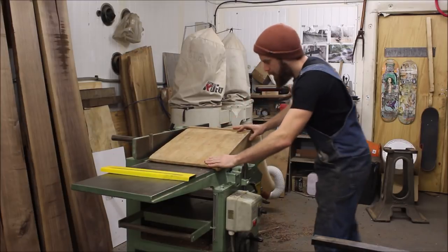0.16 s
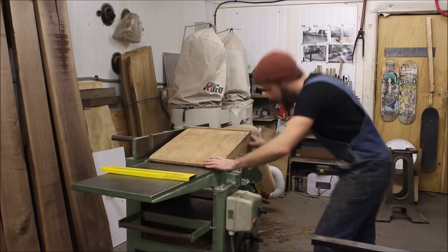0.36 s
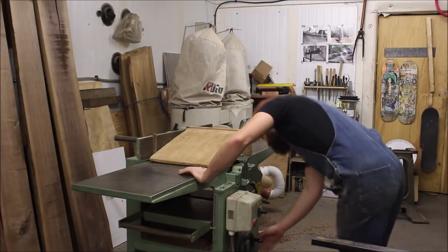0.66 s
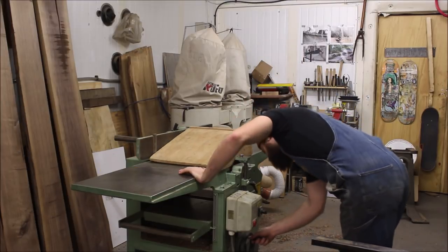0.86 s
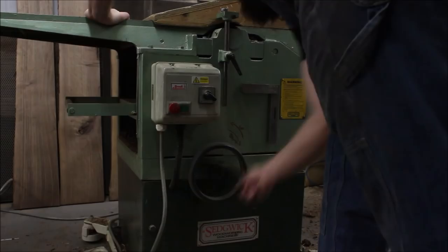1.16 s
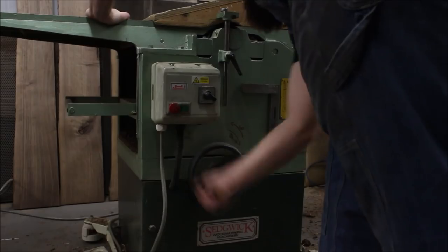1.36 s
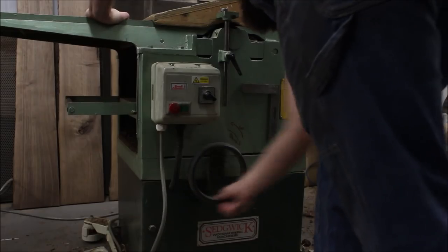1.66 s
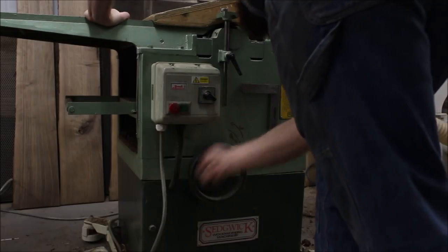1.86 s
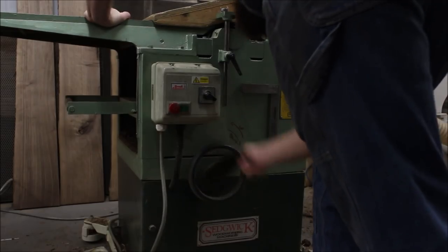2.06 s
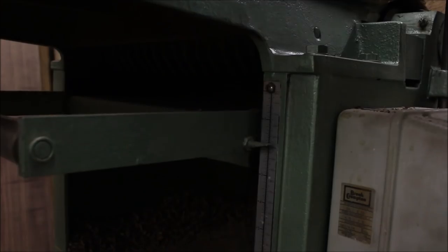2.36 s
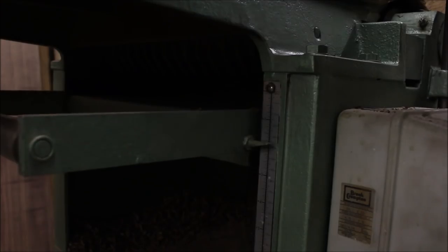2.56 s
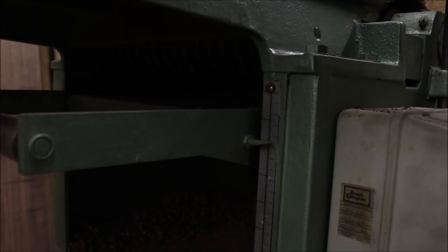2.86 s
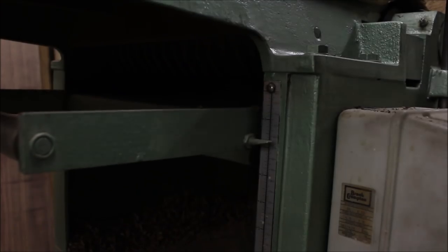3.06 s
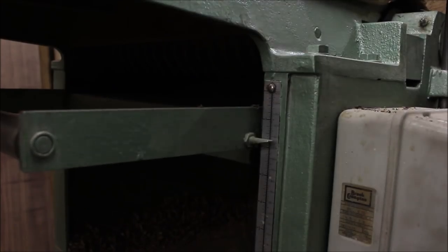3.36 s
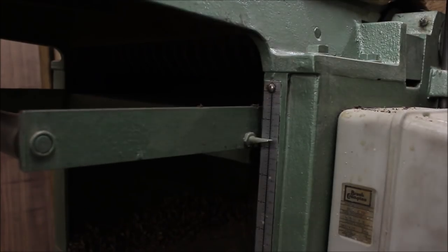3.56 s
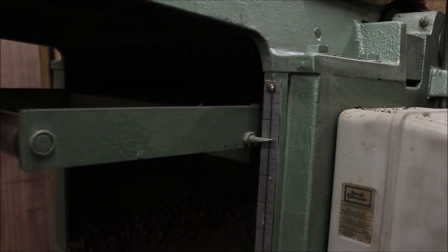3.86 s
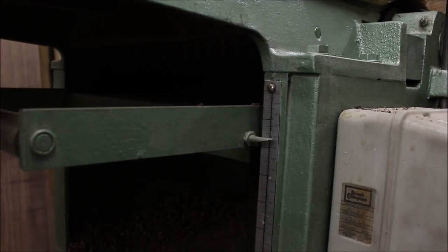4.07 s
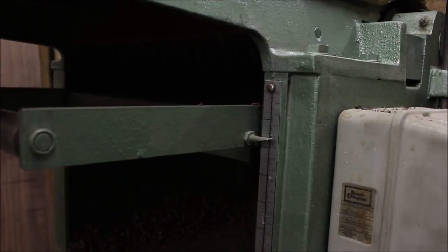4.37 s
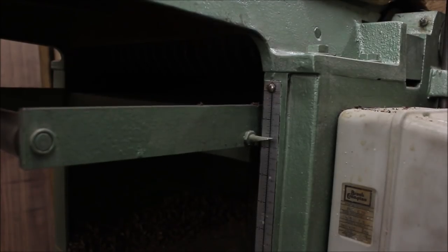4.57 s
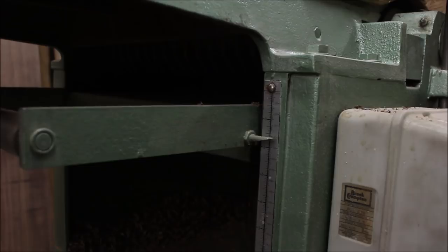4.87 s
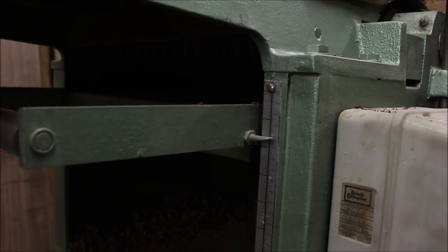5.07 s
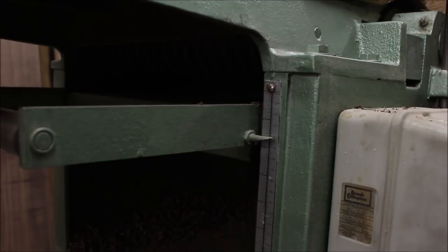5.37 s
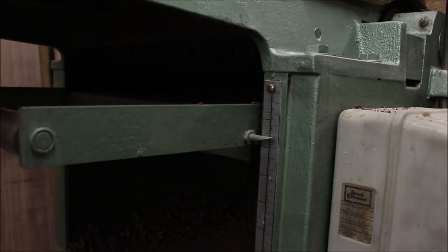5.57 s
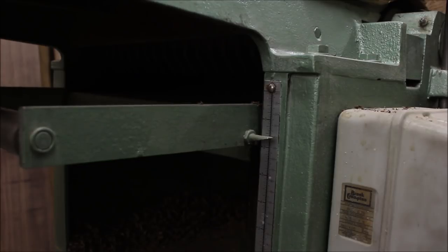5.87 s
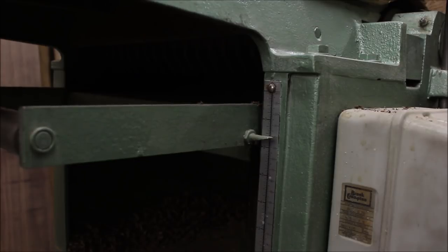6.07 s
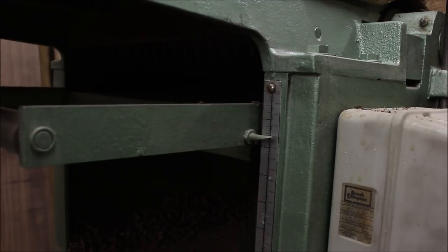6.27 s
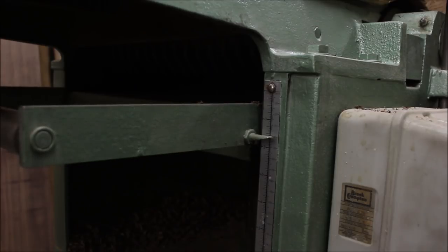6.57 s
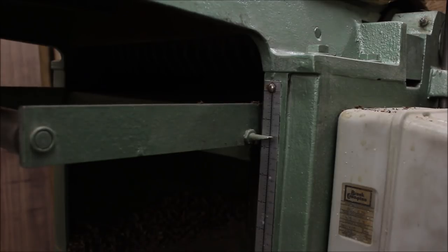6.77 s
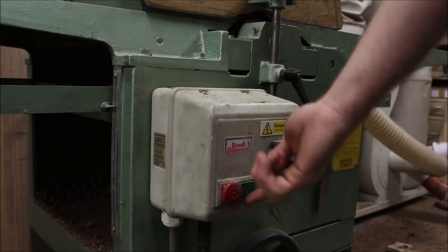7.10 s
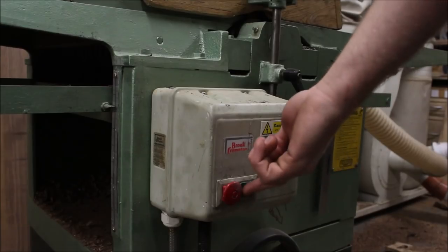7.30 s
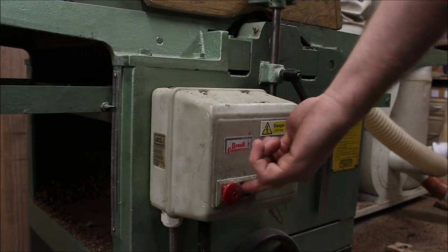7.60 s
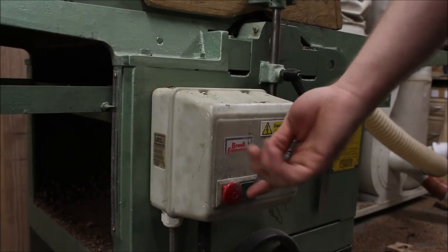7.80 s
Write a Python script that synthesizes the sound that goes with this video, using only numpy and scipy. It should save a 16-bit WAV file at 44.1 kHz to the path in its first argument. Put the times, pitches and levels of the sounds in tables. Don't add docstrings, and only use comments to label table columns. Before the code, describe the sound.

Soft room noise with low distant machine drone runs throughout, picked up by one microphone with automatic gain in a hard, ringing workshop. From 0.25 to 0.75 s hands scuff over a wooden slab in short dry strokes; a sharp knock lands at 0.83 and a duller one at 1.06. From 1.22 a handwheel turns: rapid woody-metallic knocks, small chirps around 2 kHz and piercing squeaks near 5 kHz. A very brief silent gap falls at 2.2, then squeals, a crack and chirps continue to about 3.2. Longer, wavering squeaks come at 3.45, 4.0 and, more faintly, 4.3 to 4.9, with light taps at 3.65. It is then quiet until soft taps and rubs from 5.9 to 7.45. At 7.5 a contactor snaps; a motor hum drops from its starting pitch, pulsing, with a burst of rushing air and a rising whine to the end at about 8 s.

```python
import sys
import numpy as np
from scipy import signal
from scipy.fft import rfft, irfft
from scipy.io import wavfile
from scipy.ndimage import uniform_filter1d

SR = 44100
rng = np.random.default_rng(int(sys.argv[2]) if len(sys.argv) > 2 else 0)


def elevation(decibels):
    levels = np.asarray(decibels, float)
    return 10 ** (levels / 20)


def transcribe(u):
    v = np.clip(np.atleast_2d(u).T, -1, 1)
    q = np.round(v * 32767).astype(np.int16)
    wavfile.write(sys.argv[1], SR, q)


N = 350154

# start_s, length_s, start_hz, end_hz, level_db
SCREW_SLIPS = [(1.23, 0.013, 5230, 5520, -11), (1.535, 0.018, 5120, 5300, -11),
               (1.548, 0.032, 5370, 5150, -14), (1.827, 0.013, 5300, 5280, -31.5),
               (1.986, 0.028, 5760, 5760, -32), (2.01, 0.013, 6006, 5750, -9),
               (2.021, .009, 5720, 5450, -13.5), (2.093, .013, 5726, 5400, -11),
               (2.215, .033, 5030, 5260, -33), (2.254, .02, 5080, 5060, -37),
               (2.337, 0.0088, 4960, 5110, -17.5), (2.341, 0.013, 5070, 5000, -18),
               (2.379, 0.016, 4957, 5220, -8), (2.858, 0.037, 5233, 5300, -15.5),
               (2.888, 0.018, 5170, 4970, -16.5), (2.897, 0.025, 5030, 5040, -16.5),
               (3.019, 0.029, 5196, 5326, -14.5), (3.043, 0.029, 5240, 5435, -14),
               (3.425, 0.027, 5246, 5450, -10.5), (4.001, 0.026, 4915, 4915, -25),
               (5.208, 0.054, 5225, 5040, -31.5)]
# time_s, pitch_hz, level_db
SCREW_DRAGS = [
    [(2.4, 5295, -18), (2.416, 5190, -18.5), (2.455, 5145, -28.5), (2.477, 5125, -21.5), (2.49, 5115, -39)],
    [(3.455, 5410, -40.5), (3.475, 5420, -25), (3.504, 5320, -28.5), (3.535, 5250, -20),
     (3.55, 5170, -26.5), (3.575, 5200, -46)],
    [(4.02, 4960, -28.5), (4.03, 5105, -14.5), (4.076, 5040, -26.5), (4.1, 5060, -19.5), (4.122, 5025, -17),
     (4.156, 5050, -39)],
    [(4.279, 5040, -30), (4.291, 5073, -29), (4.31, 5037, -28.5), (4.335, 4970, -34.5)],
    [(4.543, 5000, -41), (4.553, 5040, -29), (4.59, 4905, -31), (4.625, 5050, -33.5), (4.65, 5130, -28),
     (4.72, 5090, -16.5), (4.79, 5030, -37.5), (4.85, 4980, -38.5), (4.91, 4945, -57)],
]
GRAB_SHARE, LET_GO_SHARE = 0.25, 0.81
GRIP_DB, WAVER = 2.14, 0.0033
THIRD_DB = -16
SLIP_OCTAVE_DB, SLIP_OCTAVE_GROWTH = -49, 1.53
DRAG_OCTAVE_DB, DRAG_OCTAVE_GROWTH = -43, 0.41

# start_s, length_s, start_hz, end_hz, level_db
GLIDING_TONES = [(1.372, 0.0099, 2130, 1946, -10.5), (1.742, 0.0048, 4910, 4560, -11.5),
                 (2.452, 0.013, 3350, 3440, -31), (2.469, 0.023, 3420, 3072, -7.5),
                 (2.51, 0.01, 2385, 2167, -12), (2.541, 0.036, 2182, 1933, -27),
                 (3.118, 0.0099, 1630, 2007, -16), (4.135, 0.061, 1937, 1853, -15.5),
                 (5.839, 0.038, 1880, 1900, -49), (6.155, 0.046, 3710, 3560, -55),
                 (7.483, 0.032, 3200, 2990, -24)]
OVERTONES_DB, OVERTONES_DB_PER_OCTAVE = -11, -15

# start_s, peak_db, ring_hz, thud_db, crack_db
KNOCKS = [(0.831, -5, 1777, -25, -5), (1.063, -25, 2170, -14.5, -13), (1.2228, -17, 2860, -12, -3.5),
          (1.3216, -12, 1944, -27.5, -14.5), (1.3303, -25, 1630, -10.5, -12.5),
          (1.432, -13, 1990, -31, -10.5), (1.5274, -16, 1600, -37, -18), (1.6013, -3.5, 2480, -39.5, -10),
          (1.7425, -14, 2140, -35.5, 2), (1.7753, -10, 2000, -22, -15), (1.883, -11.5, 1860, -45, -19.5),
          (2.0008, -18, 1900, -14.5, -16.5), (2.0384, -23.5, 2030, -18.5, -21.5),
          (2.0863, -18, 1870, -22, -13.5), (2.2537, -28.5, 1780, -9, -4), (2.324, -17, 2123, -17, -8),
          (2.5064, -16, 2170, -51, -8.5), (2.8454, -26, 1650, -16, -10.5), (3.12, -24.5, 1830, -30, -0.5),
          (3.1433, -23, 1810, -35, -12.5), (3.1837, -26, 1850, -15, -8)]
# start_s, peak_db, ring_hz, thud_db
SWITCH_TAPS = [(3.6403, -22.5, 1280, -7), (3.7435, -44.5, 1360, 12), (3.7659, -27, 1364, -9.5),
               (4.4122, -44, 1897, -22), (5.944, -45, 1660, -6), (6.149, -39.5, 1844, -10.5),
               (6.389, -50, 1430, -20), (6.4703, -31.5, 1730, 1), (6.492, -21.5, 2040, -51),
               (6.6247, -24, 1780, -14), (6.645, -42, 1580, 9.5), (6.9317, -32, 1940, -23),
               (7.074, -48.5, 5930, -33), (7.3453, -28, 1590, -9.5), (7.4546, -27, 1360, -14.5),
               (7.519, -16, 2520, -18)]
BLOW_FADE_S = 0.028
FINGER_CRACK_DB, CONTACTOR_CRACK_DB = -20, -0.5

# start_s, length_s, level_db, ring_hz, low_part_db
STROKES = [(0.247, .04, -32, 2530, -9), (0.271, 0.083, -33, 2130, 1), (.527, .024, -20, 2240, -16),
           (0.547, 0.0147, -20.5, 2330, -4.5), (0.649, .05, -29.5, 2070, -1.5),
           (0.687, 0.049, -23.5, 2215, -10.5), (1.426, .03, -34, 1900, -5), (1.48, .025, -36, 2004, 3.5),
           (1.74, 0.019, -19, 2390, -9), (2.325, 0.022, -26.5, 1390, -5.5), (3.356, .08, -34, 1280, -3.5),
           (3.629, 0.1, -34, 1264, -5), (3.863, 0.16, -45, 1660, -6.5), (6.638, 0.039, -41, 1500, -10),
           (6.706, .14, -53.5, 2480, -14), (6.802, .14, -52.5, 2800, 0), (6.93, 0.045, -39, 1780, -7.5)]
# pitch_hz, level_db (per Hz)
RUB_COLOUR = [(59, -57), (100, 5), (343, -1.5), (415, -4), (502, 0.5), (854, 2), (2000, -9), (6560, 3.5),
              (16000, -35.5)]
PRESS_SHARE, LIFT_SHARE = 0.21, 0.3
BRIGHT_DB, BRIGHT_DB_PER_OCTAVE = -7, 15.5

MOTOR_ON_S = 7.5
INRUSH_HZ, RUNNING_HZ, SETTLE_S = 149.6, 120.8, 0.14
HUM_DB, HUM_RISE_S = -23.5, 0.061
HUM_HARMONICS_DB = [-13.5, -16, -18.5]
BEAT_HZ, BEAT_TOP_S, BEAT_DEPTH = 5.15, 7.6, 0.88
RUSH_DB, INRUSH_DB, INRUSH_S = -38, 10, 0.13
WHINE_DB, WHINE_DB_PER_S = -57.5, 59.5
# pitch_hz, level_db (per Hz)
RUSH_COLOUR = [(29, -63), (50, -28), (125, -5.5), (184, -13.5), (252, -11), (630, -13), (863, -17.5),
               (950, -14.5), (3670, -33), (8340, -38), (16000, -61)]

# pitch_hz, fade_by_60_db_s
ROOM_FADE = [(200, 0.46), (1000, 0.62), (2500, 0.67), (5000, 0.65), (10000, 0.24), (16000, 0.083)]
ROOM_LEVELS_DB = [-4.5, -3, -7.5, -7.5, -12.5]
# out_s, back_s
SCENE_CHANGES = [
    (.558, .559),
    (1.222, 1.2225),
    (2.195, 2.225),
    (7.503, 7.504),
]

# time_s, level_db
AIR_LEVEL = [(0, -43.5), (.68, -42), (1.17, -47.5), (1.97, -39), (2.37, -46.5), (2.74, -46), (3.82, -46.5),
             (4.82, -50), (5.73, -50.5), (6.72, -47), (7.05, -51.5), (7.38, -58), (7.54, -50.5),
             (7.94, -53.5)]
# pitch_hz, level_db (per Hz)
AIR_COLOUR = [(15, -56.5), (25, -5), (80, -7), (273, -9), (313, -6), (457, -7), (524, -9), (600, -9),
              (809, -14.5), (1090, -11), (1180, -10.5), (15200, -32), (16500, -43)]
AIR_BRIGHT_DB, AIR_BRIGHT_GROWTH = -4.5, -0.068
RUMBLE_DB = -66.5
# pitch_hz, level_db
FAR_TONES = [(398.4, -65), (1093, -67), (1265, -100), (1884, -80)]
# start_s, length_s, level_db
FAR_DRONES = [(-.3, 0.58, -47), (.85, 0.67, -55.5), (1.4, 0.71, -51), (2.22, .3, -55), (2.65, 0.25, -54),
              (3.3, 1.4, -67), (5.0, 0.44, -66.5), (6.398, 0.52, -58)]
DRONE_OCTAVE_DB = -5.5


def in_time(rows):
    return np.interp(np.arange(N) / SR, *np.transpose(rows))


def at_hz(points, hz):
    points_hz, values = np.transpose(points)
    return np.interp(np.log(hz + 1), np.log(points_hz), values)


def rms_one(x):
    return x / np.sqrt(np.mean(x ** 2) + 1e-20)


def band(x, low_hz, high_hz, order=2):
    sos = signal.butter(order, [low_hz, min(high_hz, 19000)], "band", fs=SR, output="sos")
    return signal.sosfilt(sos, x)


def drift(rate_hz):
    slow = rng.standard_normal(N // 40 + 2002)
    r = np.exp(-80 * np.pi * rate_hz / SR)
    slow = signal.lfilter([1], [1, -2 * r, r * r], slow)[2000:]
    return np.interp(np.arange(N) / 40, np.arange(len(slow)), rms_one(slow))


def colour(x, spectrum):
    hz = np.arange(N // 2 + 1) * SR / N
    return rms_one(irfft(rfft(x) * elevation(at_hz(spectrum, hz)), N))


def swell(length_s, rise_s, fall_s):
    t = np.arange(max(round(length_s * SR), 2)) / SR
    ramp = np.clip(np.minimum(t / rise_s, (length_s - t) / fall_s), 0, 1)
    return np.sin(np.pi / 2 * ramp) ** 2


def squeals():
    out, waver, grip = np.zeros(N), drift(46), drift(49)

    def slip(start_s, shape, hz, level_db, octave_db):
        start = round(start_s * SR)
        on = slice(start, start + len(shape))
        turn = 2 * np.pi * np.cumsum(hz * (1 + WAVER * waver[on])) / SR
        upper = np.sin(2 * turn) + elevation(THIRD_DB) * np.sin(3 * turn)
        tone = elevation(level_db) * np.sin(turn) + elevation(octave_db) * upper
        out[on] += shape * elevation(5 + GRIP_DB * grip[on]) * tone

    for start_s, length_s, start_hz, end_hz, level_db in SCREW_SLIPS:
        shape = swell(length_s, GRAB_SHARE * length_s, LET_GO_SHARE * length_s)
        hz = np.linspace(start_hz, end_hz, len(shape))
        octave_db = SLIP_OCTAVE_DB + SLIP_OCTAVE_GROWTH * (level_db + 21)
        slip(start_s, shape, hz, level_db, octave_db)
    for rows in SCREW_DRAGS:
        time_s, pitch_hz, levels_db = np.transpose(rows)
        shape = swell(time_s[-1] - time_s[0], 0.005, 0.006)
        t = time_s[0] + np.arange(len(shape)) / SR
        hz = np.interp(t, time_s, pitch_hz)
        level_db = np.interp(t, time_s, levels_db)
        octave_db = DRAG_OCTAVE_DB + DRAG_OCTAVE_GROWTH * (level_db + 21.5)
        slip(time_s[0], shape, hz, level_db, octave_db)
    return out


def chirps():
    out = np.zeros(N)
    for start_s, length_s, start_hz, end_hz, level_db in GLIDING_TONES:
        over_db = OVERTONES_DB + OVERTONES_DB_PER_OCTAVE * np.log2(start_hz / 2000)
        n, start = round(length_s * SR), round(start_s * SR)
        turn = 2 * np.pi * np.cumsum(np.linspace(start_hz, end_hz, n)) / SR
        upper = sum(elevation(db) * np.sin((k + 2) * turn) for k, db in enumerate((0, -22, -28)))
        out[start:start + n] += elevation(level_db) * np.hanning(n) * (np.sin(turn) + elevation(over_db) * upper)
    return out


def knocks():
    out, t = np.zeros(N), np.arange(2600) / SR
    taps = [(*row, FINGER_CRACK_DB) for row in SWITCH_TAPS[:-1]]
    contactor = [(*SWITCH_TAPS[-1], CONTACTOR_CRACK_DB)]
    rise = np.minimum(t / 0.001, 1)
    dying_db = -60 * t / BLOW_FADE_S
    for start_s, peak_db, hz, thud_db, crack_db in KNOCKS + taps + contactor:
        noise = rng.standard_normal(len(t))
        spectrum = rfft(noise * elevation(dying_db))
        contact = irfft(spectrum / np.abs(spectrum), len(t)) * rise * elevation(18 + 0.47 * dying_db)
        spectrum = rfft(contact)
        size = np.abs(spectrum)
        contact = irfft(spectrum / uniform_filter1d(size, size=31) * size.mean(), len(t))
        ring = np.sin(2 * np.pi * hz * t) * rise * elevation(-1 + 2.0 * dying_db)
        body = band(contact, 0.61 * hz, 1.91 * hz, order=3) * 2.35
        crack = band(contact, 3200, 7000, order=2) * elevation(crack_db + 5)
        thud = band(noise * elevation(thud_db - 60 * t / 0.079), 210, 950, order=3) * 3.24
        start = round(start_s * SR)
        out[start:start + len(t)] += elevation(peak_db) * (ring + body - crack + thud)
    return band(out, 120, 19000)


def scuffs():
    clumps_db = 4.5 * np.minimum(rng.exponential(1, N), 5) + 2.0 * drift(28)
    rub = colour(rng.standard_normal(N) * elevation(clumps_db), RUB_COLOUR)
    broad = rms_one(band(rub, 900, 5020))
    low = rms_one(band(rub, 230, 900))
    bright = rms_one(band(rub, 3600, 20000))
    out = np.zeros(N)
    for start_s, length_s, level_db, hz, low_db in STROKES:
        shape = swell(length_s, PRESS_SHARE * length_s, LIFT_SHARE * length_s)
        start = round(start_s * SR)
        on = slice(start, start + len(shape))
        ring = rms_one(band(rub[on], 0.69 * hz, 1.28 * hz))
        middle = 0.8 * min(hz / 2000, 1) ** 2.0 * broad[on] + 0.54 * ring
        bright_db = BRIGHT_DB + BRIGHT_DB_PER_OCTAVE * np.log2(hz / 2000)
        stroke = middle + elevation(low_db) * low[on] + elevation(bright_db + 1) * bright[on]
        out[on] += shape * elevation(level_db - 1.5) * stroke
    return out


def motor():
    t = np.maximum(np.arange(N) / SR - MOTOR_ON_S, 0)
    hz = RUNNING_HZ + (INRUSH_HZ - RUNNING_HZ) * np.exp(-t / SETTLE_S)
    turn = 2 * np.pi * np.cumsum(hz) / SR
    beat = 1 - BEAT_DEPTH * np.sin(np.pi * BEAT_HZ * (t + MOTOR_ON_S - BEAT_TOP_S)) ** 2
    upper = sum(elevation(db) * np.sin((k + 2) * turn) for k, db in enumerate(HUM_HARMONICS_DB))
    hum = elevation(HUM_DB) * beat * np.minimum(t / HUM_RISE_S, 1) ** 2 * (np.sin(turn) + upper)
    rattle = rng.standard_normal(N) * elevation(0.5 * drift(24) + 0.78 * np.sin(turn))
    rush_db = RUSH_DB + INRUSH_DB * np.exp(-t / INRUSH_S)
    rush = elevation(rush_db + 5.5) * colour(rattle, RUSH_COLOUR)
    whine_noise = rms_one(band(rng.standard_normal(N), 590, 653))
    whine = elevation(WHINE_DB + WHINE_DB_PER_S * t - 3.0) * whine_noise
    return np.minimum(t / 0.032, 1) * (hum + rush + whine)


def room(x):
    out = np.zeros(N)
    starts = [0] + [round(back_s * SR) for out_s, back_s in SCENE_CHANGES]
    ends = [round(out_s * SR) for out_s, back_s in SCENE_CHANGES] + [N]
    for start, end, room_db in zip(starts, ends, ROOM_LEVELS_DB):
        reply = signal.fftconvolve(x[start:end], tail())
        out[start:end] = elevation(room_db) * reply[:end - start]
    return out


def tail():
    t = np.arange(round(0.9 * SR)) / SR
    out = np.zeros(len(t))
    edges_hz = 100 * 2 ** np.arange(0, 7.6, 0.5)
    white = rng.standard_normal((2, len(t)))
    for k, (low_hz, high_hz) in enumerate(zip(edges_hz, edges_hz[1:])):
        fade_s = at_hz(ROOM_FADE, np.sqrt(low_hz * high_hz))
        out += band(white[k % 2], low_hz, high_hz) * elevation(-60 * t / fade_s)
    out *= np.clip((t - 0.004) / 0.0027, 0, 1)
    return out / np.sqrt(np.sum(out ** 2))


def air():
    level_db = in_time(AIR_LEVEL)
    bright_db = AIR_BRIGHT_DB + AIR_BRIGHT_GROWTH * (level_db + 48)
    drone = np.full(N + 2 * SR, elevation(-76))
    for start_s, length_s, drone_db in FAR_DRONES:
        shape = swell(length_s, 0.29 * length_s, 0.29 * length_s)
        start = round((start_s + 1) * SR)
        drone[start:start + len(shape)] += elevation(drone_db) * shape
    noise = colour(rng.standard_normal(N), AIR_COLOUR)
    rumble = elevation(RUMBLE_DB) * rms_one(band(noise, 36, 47))
    tone = band(noise, 55, 19000)
    octave = rms_one(band(tone, 240, 270))
    low = signal.sosfilt(signal.butter(1, 1100, fs=SR, output="sos"), tone)
    tone = elevation(level_db - 0.5 + 1.0 * drift(36)) * (low + elevation(bright_db) * (tone - low))
    hum = rms_one(band(rng.standard_normal(N), 112, 140)) + elevation(DRONE_OCTAVE_DB) * octave
    lines = np.zeros(N)
    for hz, line_db in FAR_TONES:
        lines += elevation(line_db) * rms_one(band(rng.standard_normal(N), hz - 12, hz + 12))
    return rumble + tone + drone[SR:SR + N] * hum + lines


def scene():
    screw, handle = squeals(), chirps()
    beats = elevation(7.5) * screw * handle
    near = screw + handle + beats + knocks() + scuffs()
    mix = near + beats + room(near) + air() + motor()
    return np.array([mix, mix])


def low_pass(x):
    return signal.sosfilt(signal.butter(12, 17010, fs=SR, output="sos"), x)


def record(dry):
    t = np.arange(N) / SR
    level_db = 10 * np.log10(uniform_filter1d(dry[0] ** 2, size=220) + 1e-10)
    held_db = np.maximum.accumulate(level_db + 60 * t) - 60 * t
    duck_db = -0.3 * np.maximum(held_db + 20.5, 0)
    gain = elevation(signal.lfilter([0.01], [1, -0.99], duck_db))
    out_s, back_s = SCENE_CHANGES[2]
    gain = gain * np.clip(np.maximum(out_s - t, t - back_s) / 0.0017, elevation(-63), 1)
    hiss = elevation(-68) * rng.standard_normal(N) * (t < SCENE_CHANGES[3][0]) * [[1], [-1]]
    mix = np.clip(dry * gain + hiss, -0.52, 0.52)
    return low_pass(mix)


dry = scene()
out = record(dry)
transcribe(out)
```